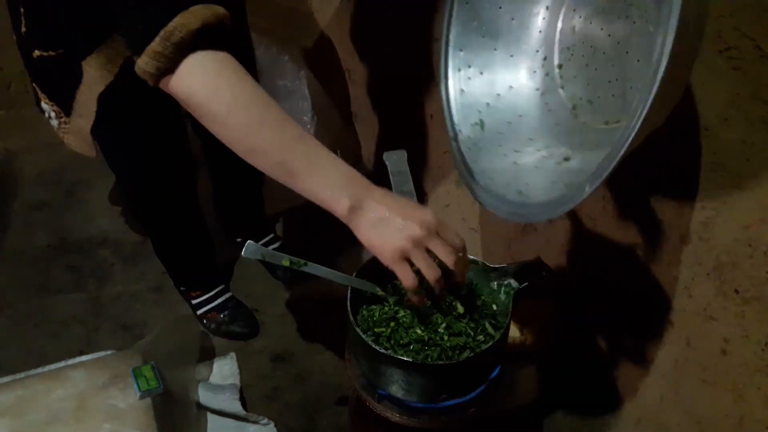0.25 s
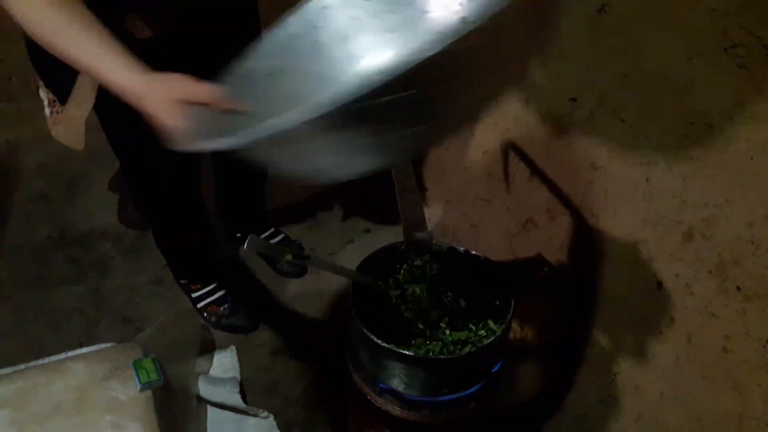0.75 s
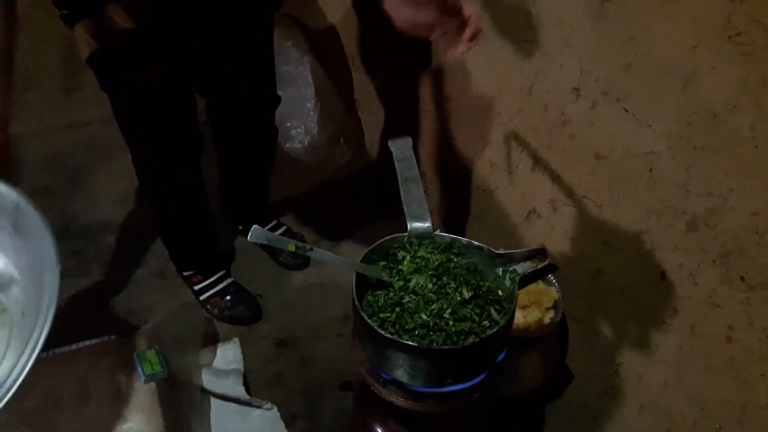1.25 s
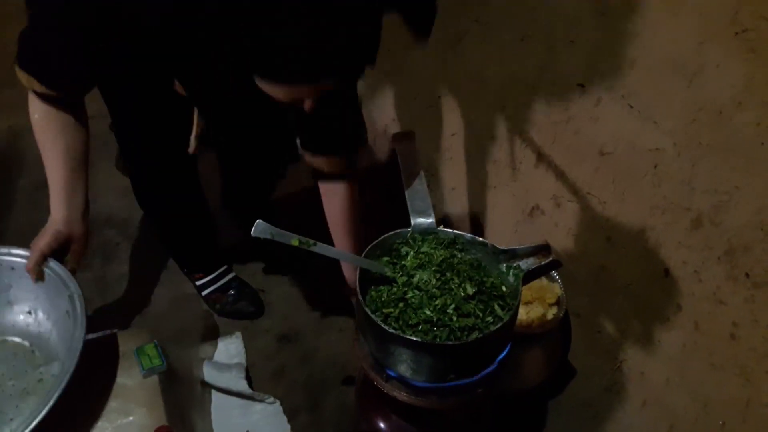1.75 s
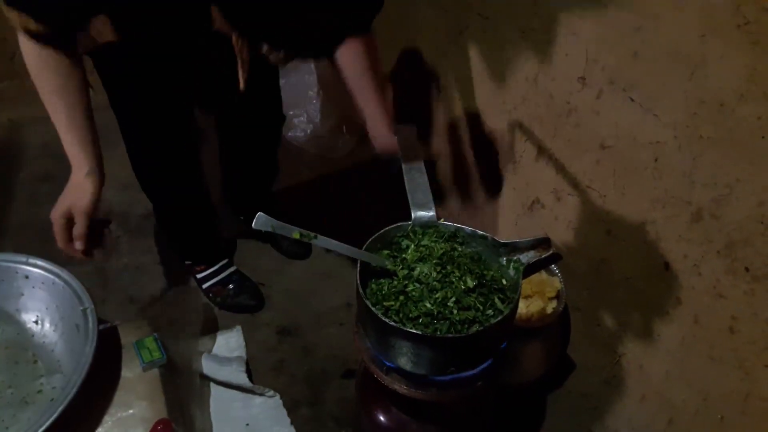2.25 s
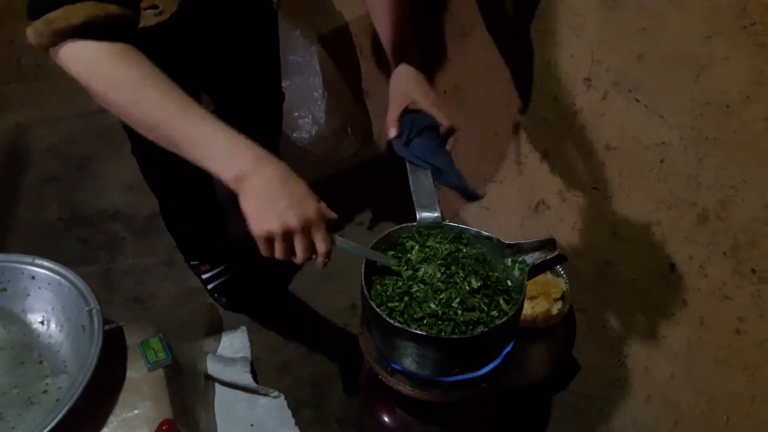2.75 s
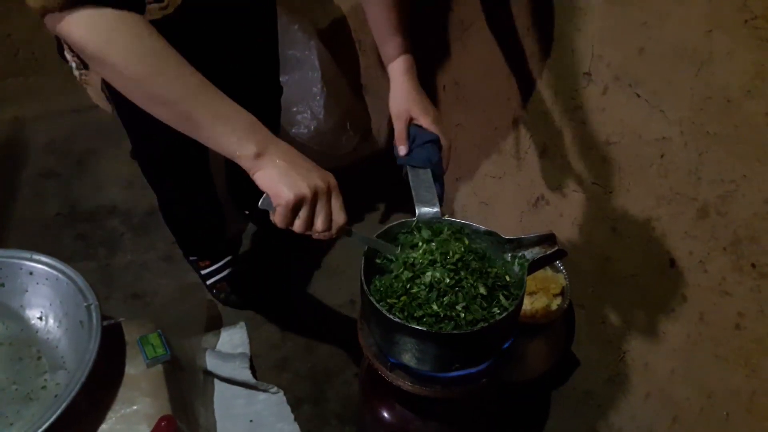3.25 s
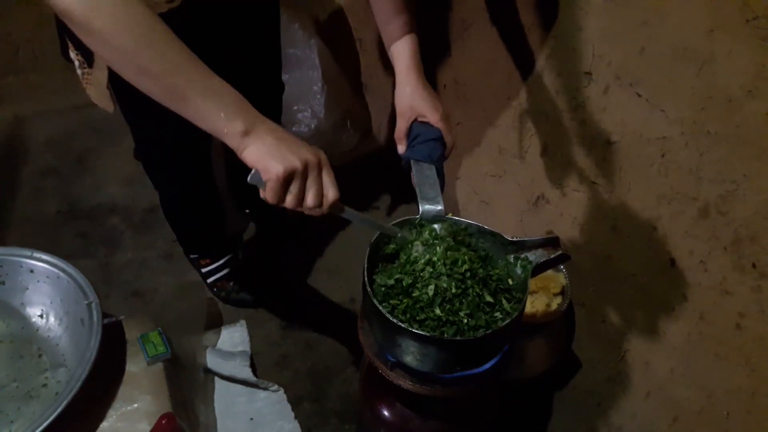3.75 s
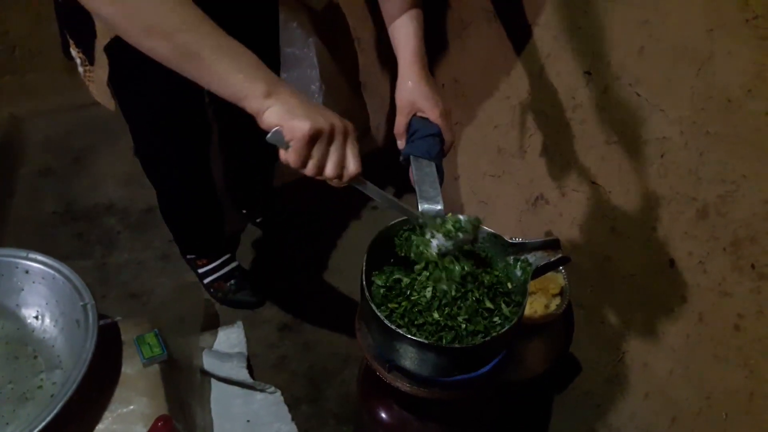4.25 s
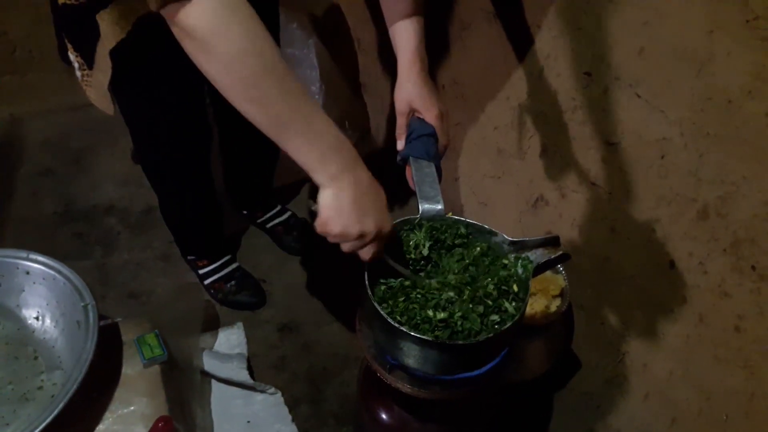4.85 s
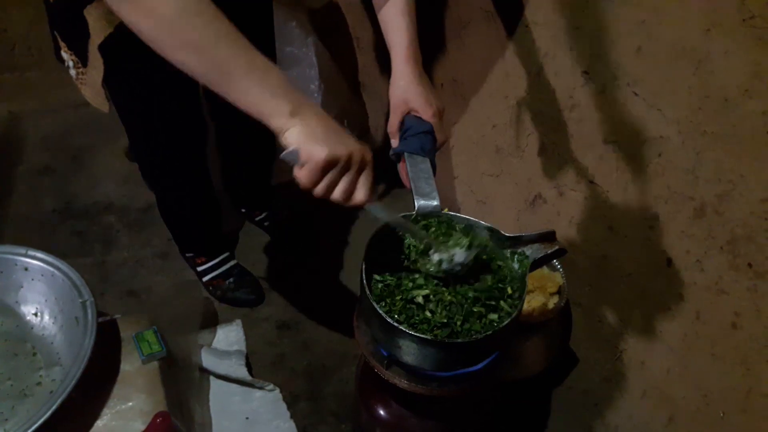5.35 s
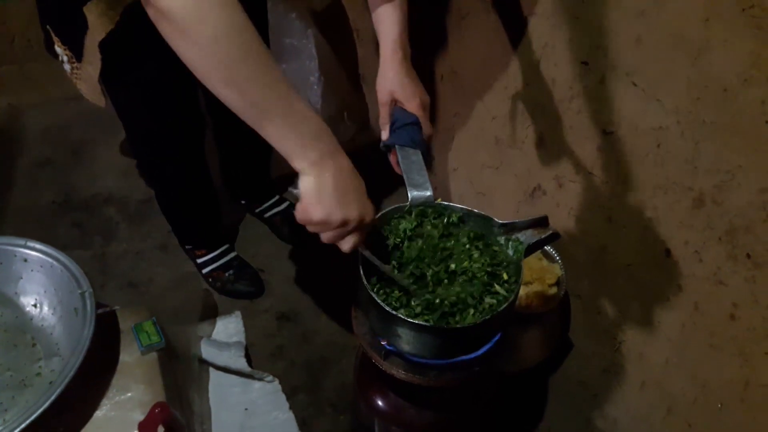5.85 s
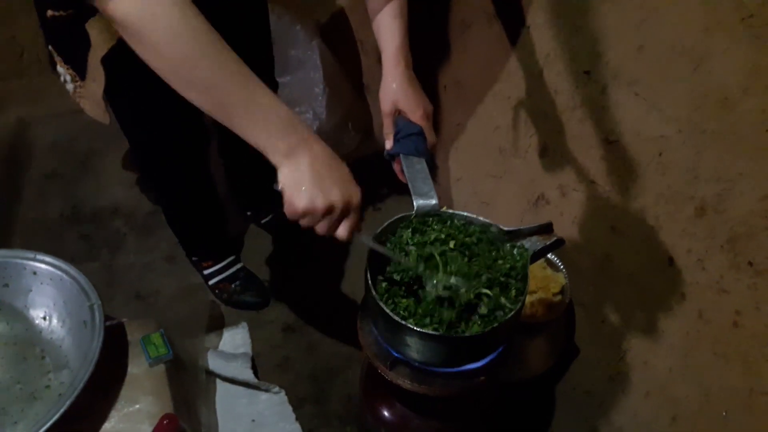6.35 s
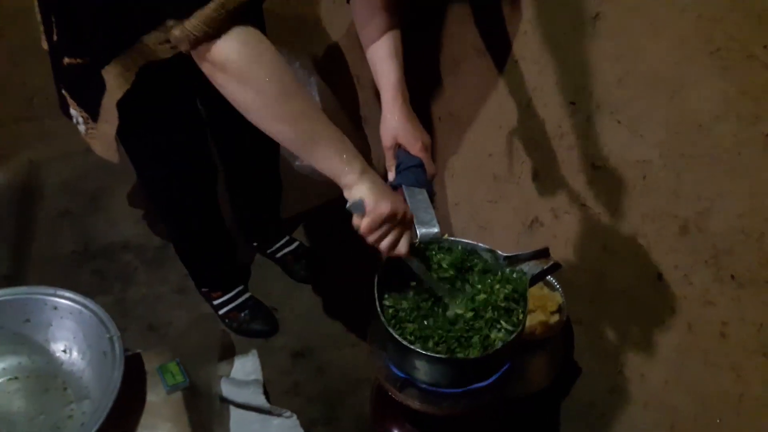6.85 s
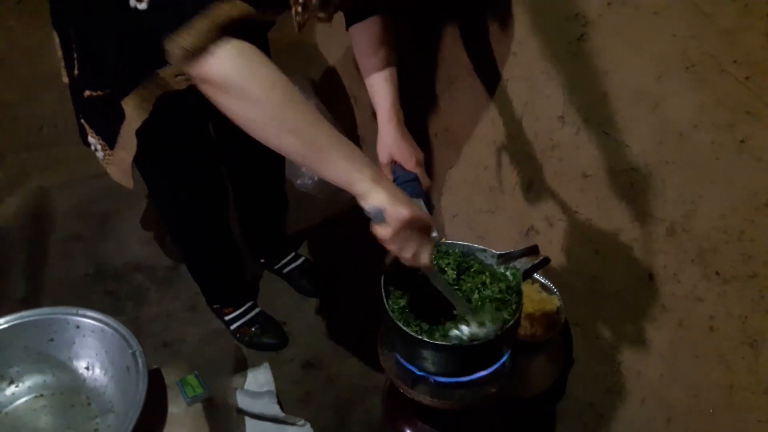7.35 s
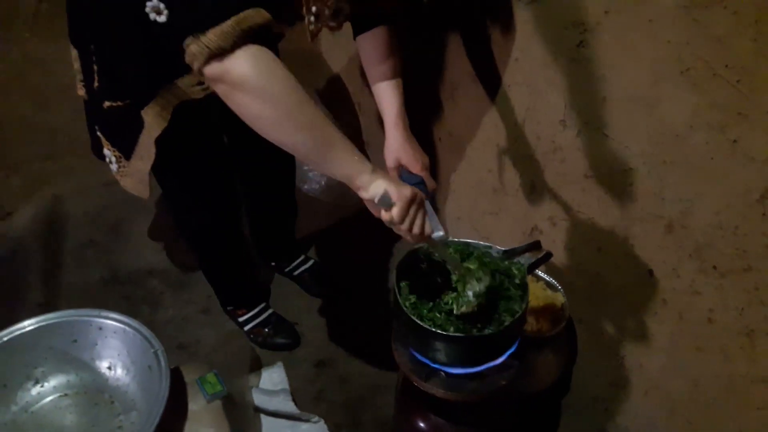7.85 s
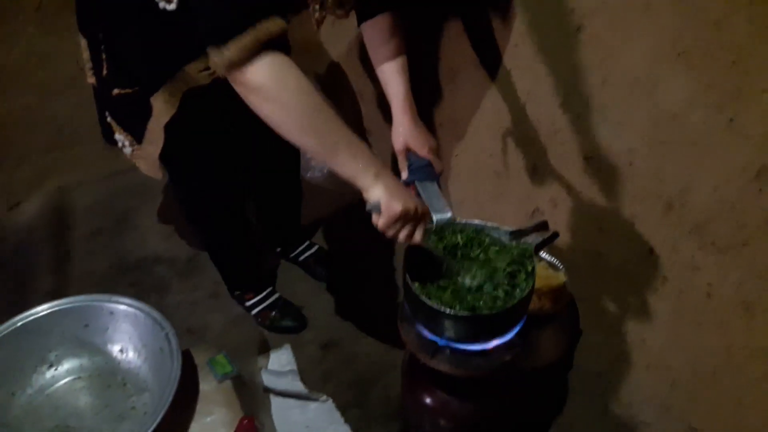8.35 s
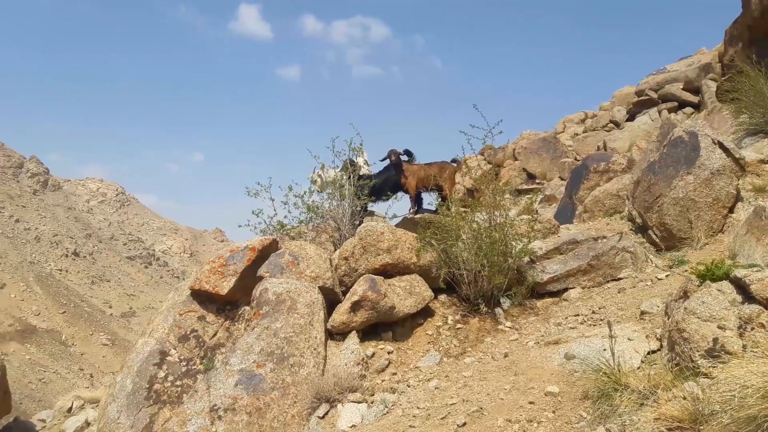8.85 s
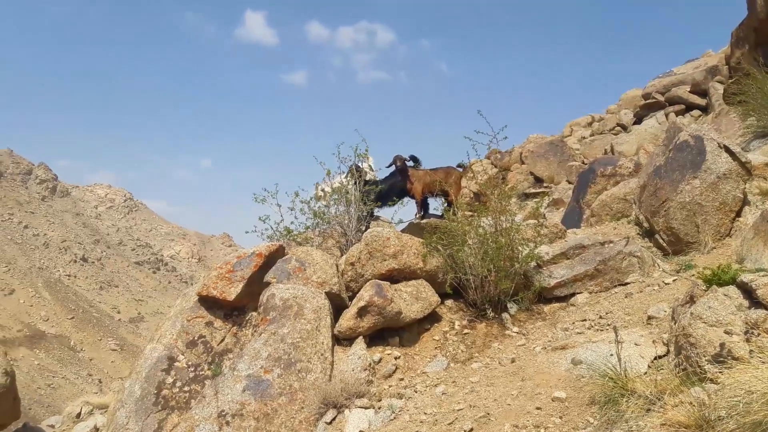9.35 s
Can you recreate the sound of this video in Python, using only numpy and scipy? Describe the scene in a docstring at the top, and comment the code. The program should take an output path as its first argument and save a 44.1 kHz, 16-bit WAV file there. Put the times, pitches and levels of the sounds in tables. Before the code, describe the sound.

A gas burner hisses steadily throughout in a small bare room, heard through one microphone with dull treble. Far beneath the hiss, flames flutter and tiny steam bubbles pop under greens in a metal pot. During the first four seconds there are soft scuffs and dull bumps as a basin is set down and the cook shuffles closer. From about 4.5 to 7 seconds a spatula stirs the wet leaves in three quiet, squelching strokes. It clanks on the pot at about 5.8, 7.4 and 8.7 seconds, the last two ringing briefly. The pot thumps on its stand around 5.8, 7.1 and 8.5 seconds, with small scrapes near 6.2 and 8.2. A faint, very high, airy whistle grows slowly, peaks near 7 seconds and fades. The hiss gets slightly louder and changes tone as the microphone comes closest around 7.7 seconds, then eases back by 9.5.

```python
"""Greens cook in a metal pot in a small bare room, heard through one dull microphone.
From the start, bottled gas hisses through the burner's jet, the flames flutter and steam bubbles pop.
The cook puts a basin down and shuffles closer. From about 4 seconds a spatula stirs the wet leaves;
it clanks on the pot three times, and the pot thumps on its stand. A faint high whistle peaks near
7 seconds. The microphone is closest just after that, then backs away."""
import sys
import numpy as np
from scipy import signal
from scipy.fft import rfft, irfft
from scipy.io import wavfile

SR = 44100
rng = np.random.default_rng(int(sys.argv[2]) if len(sys.argv) > 2 else 0)


def transcribe(signal):
    """Save signal, clipped to [-1, 1], as a 16-bit WAV file at the path in sys.argv[1]."""
    frames = np.atleast_2d(signal).T
    limited = np.clip(frames, -1, 1)
    pcm = np.round(limited * 32767).astype(np.int16)
    wavfile.write(sys.argv[1], SR, pcm)


N = 422919
T = np.arange(N) / SR

# Tone shapes: how strong each sound is from low to high. Each row: frequency in Hz, level in dB per Hz.
FLAME_SHAPE = [(25, -28), (45, -27), (58, -10), (98, -15), (126, 4), (220, -4.5), (330, 0.5), (470, -5.5),
               (750, -2.5), (1200, -5.5), (2200, -10.5), (5000, -32)]
HISS_SHAPE = [(300, -26), (1400, -19.5), (2300, -14), (3300, -5.5), (4300, -1.5), (5300, -5.5),
              (6100, -3.5), (6850, -9), (7300, -8.5), (8200, -21), (9300, -13), (11000, -14), (15500, -16)]  # the gas hiss between its resonances
SCUFF_SHAPE = [(60, -19), (150, 9), (400, 2), (900, -2.5), (2200, 2), (4000, -3.5), (8000, -8.5),
               (15500, -4)]
LEAF_SHAPE = [(100, -27.5), (450, -12), (750, 3), (1200, -3.5), (2000, -4.5), (4000, -14.5), (12000, -20.5)]
CRACK_SHAPE = [(60, -21), (250, -10.5), (450, -1), (800, -0.5), (1050, -4), (1400, 2), (2300, 0.5),
               (3000, 1), (4500, -2), (6500, -1.5), (7500, -13.5), (10000, -7.5), (15500, -25)]  # the spatula striking the pot
# Resonances, the pitches that the gas jet and its mixing tube favour.
# Each row: pitch in Hz, width in Hz, level from afar in dB, level from close by in dB.
JET_RESONANCES = [(2200, 150, -14.5, -8), (2795, 160, -6.5, -19), (3210, 170, -8.5, -6),
                  (3580, 176, 1, -0.5), (3764, 102, 1, -3), (4565, 320, -1.5, 2.5), (4747, 144, 6.5, 4.5),
                  (5020, 203, 3.5, 5.5), (5520, 166, 2.5, 2.5), (5820, 290, 1.5, -17),
                  (6530, 210, -7.5, -8), (7140, 180, -7.5, -18), (10170, 400, -3, -3.5)]
# The tone shape of a thump. Each row: multiple of the thump's pitch, level in dB per Hz.
THUMP_SHAPE = [(.12, -45), (.4, -20.5), (.7, -9), (1, 2), (1.35, -9.5), (2.1, -10), (3.5, -25.5), (10, -63)]
# Dull thumps of the pot on its stand and of things on the floor.
# Each row: start in seconds, level in dB, pitch in Hz, seconds to fade by 60 dB.
THUMP_EVENTS = [(.75, -46.5, 662, 0.16), (1.165, -52, 610, 0.06), (1.615, -50, 135, 0.15),
                (1.838, -45, 258, 0.22), (2.058, -41, 142, 0.25), (2.064, -45, 258, 0.14),
                (2.702, -52, 140, 0.21), (2.99, -51, 228, 0.13), (3.576, -43, 132, 0.17),
                (3.843, -45, 364, 0.072), (5.846, -34, 166, 0.18), (6.077, -37, 728, 0.12),
                (6.26, -56, 109, 0.32), (7.143, -37.5, 272, 0.11), (7.147, -36.5, 114, .18),
                (7.172, -37.5, 177, 0.17), (7.445, -41, 150, 0.15), (8.298, -41.5, 209, 0.07),
                (8.497, -37.5, 303, 0.074), (8.506, -36.5, 182, 0.24)]
# Scuffs of basin, shoes and spatula.
# Each row: start in seconds, length in seconds, level in dB, tilt towards treble in dB per octave.
SCUFF_EVENTS = [(0, 0.034, -38, 2), (1.607, 0.078, -43.5, -0.1), (1.83, 0.14, -41.5, 0.8),
                (1.871, 0.03, -43, 2), (2.68, 0.075, -44.5, -1.3), (6.075, 0.012, -39.5, 0),
                (6.205, 0.036, -37, 7), (6.208, 0.049, -45, -1.5), (8.171, 0.054, -46.5, 0.5)]
# Strokes through the leaves. Each row: time of the strongest push and length in seconds, level in dB.
STIR_STROKES = [(5.074, 1.18, -51), (6.059, 0.99, -49.5), (6.856, 0.82, -55), (8.2, 0.18, -58)]
# The notes the filled pot rings with. Each row: pitch in Hz, seconds to fade by 60 dB,
# level in dB when struck on the wall, level in dB when struck on the rim.
POT_NOTES = [(797.4, 0.31, -5, -25), (1410, 0.24, -1, -27), (1615, 0.3, 0, -21), (1833, 0.21, -2.5, 1),
             (2160, 0.27, 4, -4), (2447, 0.15, 0, 6), (2750, 0.19, -7, -3), (3570, 0.61, -3, 0),
             (3400, .26, -4.5, 4.5), (4070, 0.23, 3, -9), (4450, .3, -8, -17), (4970, 0.24, -2, -28),
             (5500, 0.32, -11, 4), (5997, 0.12, -5, 18)]
# The spatula hitting the pot. Each row: start in seconds, crack level in dB, crack tilt in dB per
# octave, ring level in dB, jolt level in dB, place from 0 (wall) to 1 (rim), seconds until the second
# contact, its level in dB compared with the first.
SPATULA_HITS = [(5.8327, -29, -0.3, -54, -23.5, 0.83, 0.006, 7),
                (7.433, -25, 1, -35, -33, 0.46, 0.0059, 8.5),
                (8.7364, -27, 0.25, -34.5, -54, 0.069, 0.0048, -4)]
# How the microphone moves. Each row: time in seconds, closeness from 0 (far) to 1 (close).
MIC_CLOSENESS = [(0, 0.25), (3.5, 0), (6.5, 0.33), (7.7, 1), (8.7, 0.94), (9.59, 0.25)]
# How the microphone dulls the treble. Each row: frequency in Hz, gain in dB.
MIC_DULLING = [(7250, 0), (7600, -8), (8000, -20), (15000, -24)]


def undb(db):
    """Turn decibels into a number to multiply by."""
    return 10 ** (np.asarray(db) / 20)


def unit(x):
    """Scale a signal so that its average strength (rms) is 1."""
    return x / np.sqrt(np.mean(x ** 2))


def curve(rows):
    """Join (seconds, value) rows with straight lines."""
    return np.interp(T, *np.reshape(rows, (-1, 2)).T)


def add(track, start, x):
    """Mix a sound into a track at a start time in seconds."""
    i = max(int(start * SR), 0)
    track[i:i + len(x)] += x[:N - i]


def response(shape, size=8192):
    """Turn a tone shape into gains at evenly spaced frequencies."""
    hz, db = np.transpose(shape)
    return undb(np.interp(np.log(np.arange(size // 2 + 1) * SR / size + 1), np.log(hz), db))


def colour(x, shape):
    """Filter a sound so that it takes on a tone shape."""
    cepstrum = irfft(np.log(response(shape)))
    half = len(cepstrum) // 2
    # folding onto the first half keeps the filter from sounding before its input
    cepstrum[1:half] *= 2
    cepstrum[half + 1:] = 0
    impulse = irfft(np.exp(rfft(cepstrum)))[:half]
    return signal.oaconvolve(x, impulse)[:len(x)]


def tilted(shape, tilt):
    """Make a tone shape brighter or darker by so many dB per octave."""
    return [(hz, db + tilt * np.log2(hz)) for hz, db in shape]


def burst(envelope, shape):
    """Noise with a tone shape, whose strength follows the envelope."""
    gain = np.sqrt(np.mean(response(shape) ** 2))
    return colour(envelope * rng.standard_normal(len(envelope)), shape) / gain


def fade(t, fade_s):
    """Start at t = 0 and die away by 60 dB every fade_s seconds."""
    return (t >= 0) * np.exp(-np.log(1000) * np.abs(t) / fade_s)


def wander(per_s):
    """Glide between random values, typically about 1 in size."""
    values = rng.standard_normal(int(N / SR * per_s) + 2)
    return unit(np.interp(T * per_s, np.arange(len(values)), values))


def pops(per_s, spread_db):
    """Random clicks, many small and a few large."""
    sizes = undb(spread_db * np.minimum(rng.exponential(size=N), 3))
    return unit((rng.random(N) < per_s / SR) * rng.standard_normal(N) * sizes)


def room(x, echo_db):
    """The direct sound, then dense echoes from floor and walls; the power stays about the same."""
    t = T[:SR // 2 + SR // 4]
    tail = rng.standard_normal(len(t)) * fade(t - .004, fade_s=0.53)
    impulse = undb(echo_db) * tail / np.linalg.norm(tail)
    impulse[0] = 1
    return signal.fftconvolve(x, impulse / np.linalg.norm(impulse))[:N]


def whistle(peak_s=6.9, peak_db=-51.5, rise_db_per_s=2.5, fall_db_per_s=14):
    """A thin, airy tone high above the hiss grows slowly and fades faster."""
    band = [(9500, -46), (11300, -24), (11730, 15), (12100, -15), (14000, -46)]
    since_peak = T - peak_s
    swell_db = np.minimum(rise_db_per_s * since_peak, -fall_db_per_s * since_peak)
    return burst(undb(peak_db + swell_db + 1.5 * wander(per_s=10)), band)


def flame():
    """The ring of flames makes a soft, low, fluttering noise."""
    roar = colour(rng.standard_normal(N), FLAME_SHAPE)
    return unit(room(roar, echo_db=-5.5)) * undb(-59 + 1.2 * wander(per_s=8.1))


def sizzle():
    """Tiny steam bubbles burst under the greens."""
    shape = [(500, -32), (2000, -2), (4500, -4.5), (7000, -5.5), (12000, -26.5)]
    crackle = colour(pops(per_s=220, spread_db=3.5), shape)
    return unit(room(crackle, echo_db=3)) * undb(-58)


def gas_hiss(far_db=-40.5, close_boost_db=2, flutter_db=0.48):
    """Gas rushes steadily through the jet; as the microphone nears, it gets louder and changes tone."""
    rush = rng.standard_normal(N) + undb(-10) * pops(per_s=1500, spread_db=1)
    rush = room(rush, echo_db=-2)
    hz = np.geomspace(100, 16000, 600)
    shape_hz, shape_db = np.transpose(HISS_SHAPE)
    base_db = np.interp(np.log(hz), np.log(shape_hz), shape_db)
    power = np.tile(undb(base_db) ** 2, (2, 1))  # one row for far, one for close
    for centre_hz, width_hz, *levels_db in JET_RESONANCES:
        off_centre = (hz - centre_hz) / (0.67 * width_hz)
        power += undb(levels_db)[:, None] ** 2 / (1 + off_centre ** 2) ** 2
    far, near = (unit(colour(rush, np.c_[hz, 10 * np.log10(row)])) for row in power)
    closeness = curve(MIC_CLOSENESS)
    level_db = far_db + close_boost_db * closeness + flutter_db * wander(per_s=13)
    return (far + closeness * (near - far)) * undb(level_db)


def thump(pitch_hz, fade_s):
    """A soft, heavy bump: one low note dies quickly inside a short shudder of noise."""
    t = T[:SR // 2]
    note = np.sin(2 * np.pi * pitch_hz * t) * fade(t, 0.5 * fade_s) * np.minimum(t * pitch_hz, 1)
    shudder = burst(fade(t, fade_s), [(multiple * pitch_hz, db) for multiple, db in THUMP_SHAPE])
    return 1.25 * note + 0.77 * shudder


def thumps_and_scuffs():
    """Things bump and scrape as the cook moves about and works the pot."""
    thumps, scuffs, t = np.zeros(N), np.zeros(N), T[:SR // 2]
    for start, db, pitch_hz, fade_s in THUMP_EVENTS:
        add(thumps, start, undb(db) * thump(pitch_hz, fade_s))
    grit = undb(2.1 * wander(per_s=150))
    for start, length, db, tilt in SCUFF_EVENTS:
        push = np.minimum(t / 0.004, 1) * fade(np.maximum(t - length, 0), 0.01)
        push *= grit[int(start * SR):][:len(t)]
        add(scuffs, start, undb(db) * burst(push, tilted(SCUFF_SHAPE, tilt)))
    return room(thumps, echo_db=-2) + room(scuffs, echo_db=1.5)


def wet_leaves(settle_db=-61, close_change_db=-7.5, rise_share=0.59):
    """Wet leaves settle softly in the heat; with each stroke they slide and squelch unevenly."""
    clicks = pops(per_s=900, spread_db=-0.5) * undb(1.2 * wander(per_s=22))
    squelch = colour(clicks, LEAF_SHAPE)
    power = undb(settle_db + close_change_db * curve(MIC_CLOSENESS)) ** 2
    for peak_s, length, db in STIR_STROKES:
        start, end = peak_s - rise_share * length, peak_s + (1 - rise_share) * length
        power += undb(db) ** 2 * np.interp(T, [start, peak_s, end], [0, 1, 0])
    return unit(room(squelch, echo_db=9.5)) * np.sqrt(power)


def spatula_clanks():
    """Each clank is two quick contacts of metal on metal; the pot rings and jolts on its stand."""
    cracks, rings, jolts, t = np.zeros(N), np.zeros(N), np.zeros(N), T[:SR]
    for start, crack_db, tilt, ring_db, jolt_db, place, again_s, again_db in SPATULA_HITS:
        contacts = fade(t, 0.036) + undb(again_db) * fade(t - again_s, 0.024)
        chatter = fade(t, 0.095)
        add(cracks, start, undb(crack_db) * burst(contacts + chatter, tilted(CRACK_SHAPE, tilt)))
        add(jolts, start + 0.012, undb(jolt_db) * thump(pitch_hz=300, fade_s=0.056))
        for hz, fade_s, wall_db, rim_db in POT_NOTES:
            # dents split each note into two close pitches, so the ring wavers
            twin_hz = hz * (1 + 0.013 * rng.standard_normal())
            twin = np.sin(2 * np.pi * (twin_hz * t + rng.random()))
            pair = np.sin(2 * np.pi * hz * t) + .5 * twin
            note_db = ring_db + wall_db + place * (rim_db - wall_db)
            add(rings, start, rng.choice([-1, 1]) * undb(note_db) * pair * fade(t, fade_s))
    # the far wall throws the crack back once
    bounce = np.zeros(N)
    add(bounce, .035, undb(-8) * cracks)
    return room(cracks + bounce, echo_db=-1) + room(rings, echo_db=-8.5) + room(jolts, echo_db=0)


def scene():
    """Everything meets at one microphone; it is almost mono, with a faint low stereo spread added."""
    cooking = flame() + sizzle() + wet_leaves() + spatula_clanks() + thumps_and_scuffs()
    middle = gas_hiss() + whistle() + cooking
    spread = undb(-31) * colour(room(cooking, echo_db=21), [(1000, 8.5), (2200, -11.5)])
    return np.array([middle + spread, middle - spread])


def record(dry, top_hz=15750):
    """The microphone dulls the high treble, and a steep filter cuts off what lies above top_hz."""
    dull = np.array([colour(channel, MIC_DULLING) for channel in dry])
    return signal.sosfilt(signal.ellip(10, .1, 70, top_hz, fs=SR, output="sos"), dull)


dry = scene()
out = record(dry)
transcribe(out)
```